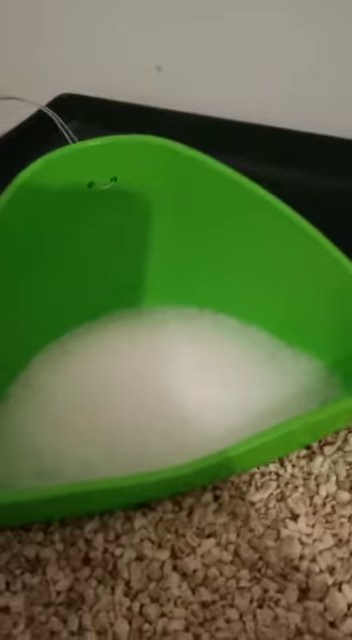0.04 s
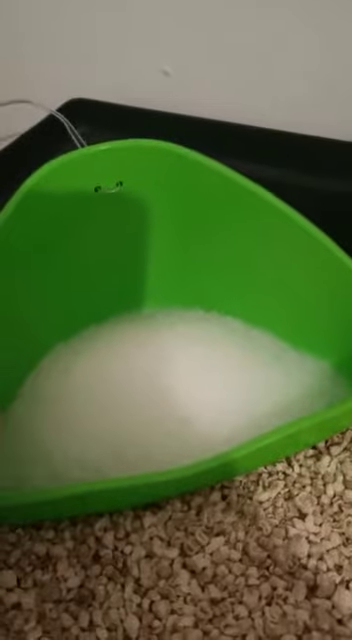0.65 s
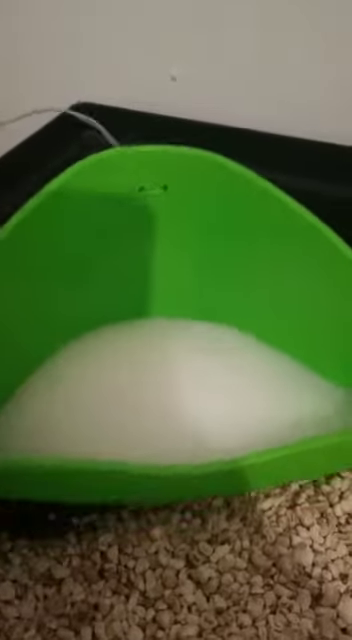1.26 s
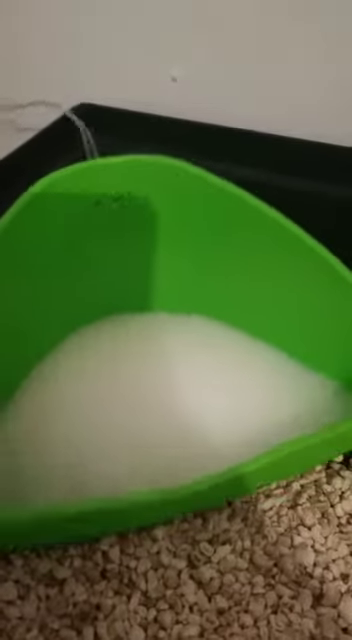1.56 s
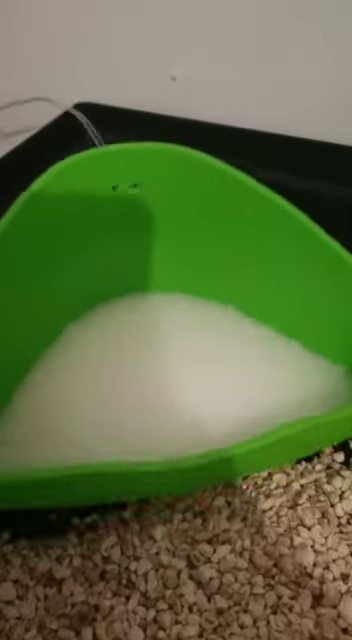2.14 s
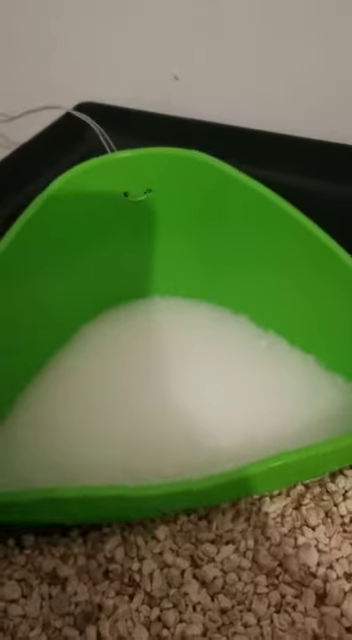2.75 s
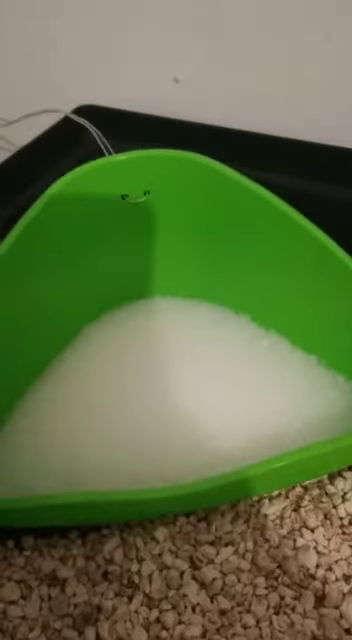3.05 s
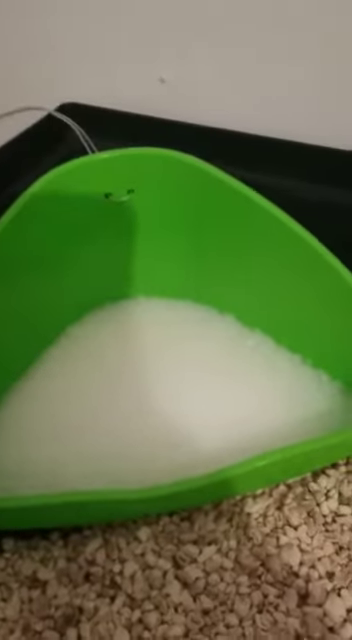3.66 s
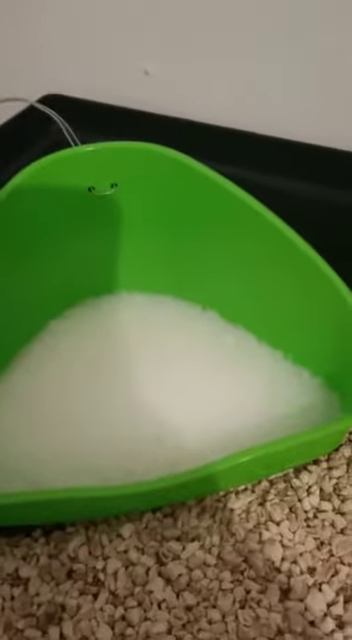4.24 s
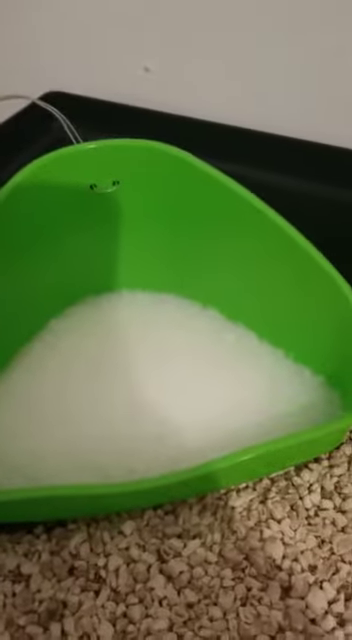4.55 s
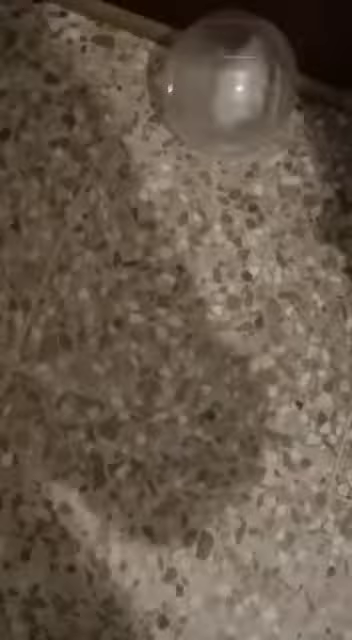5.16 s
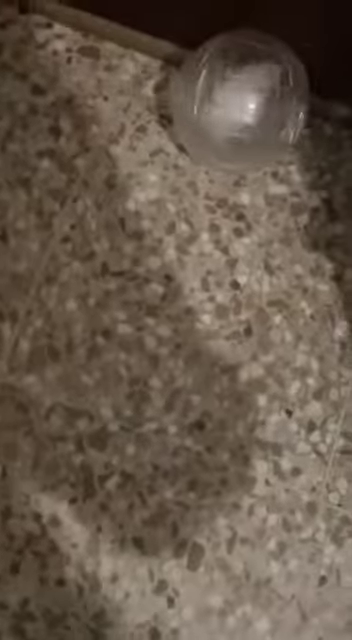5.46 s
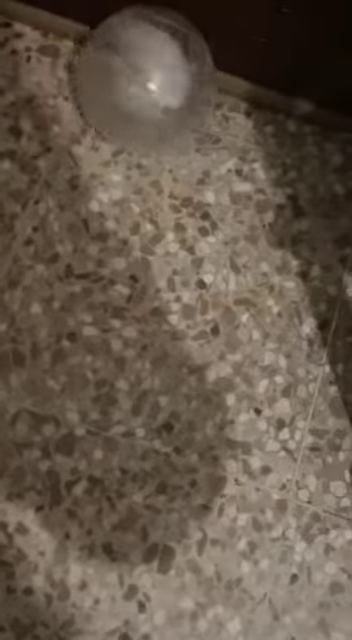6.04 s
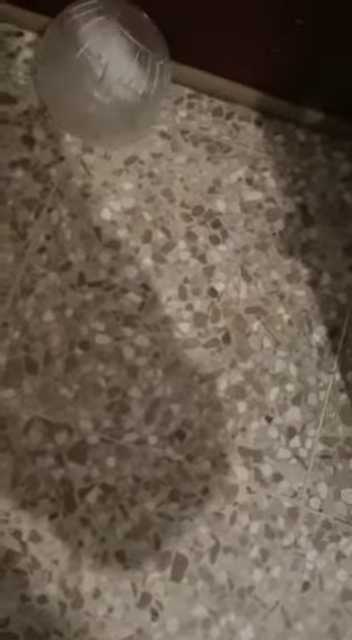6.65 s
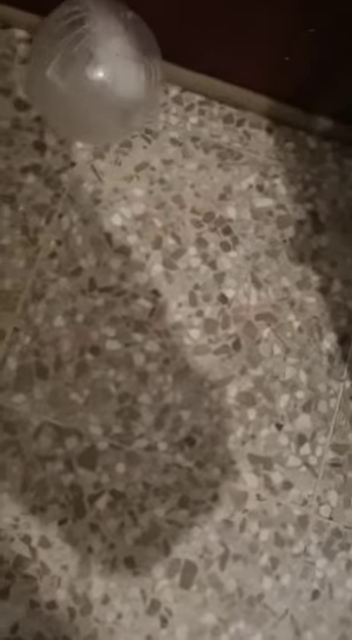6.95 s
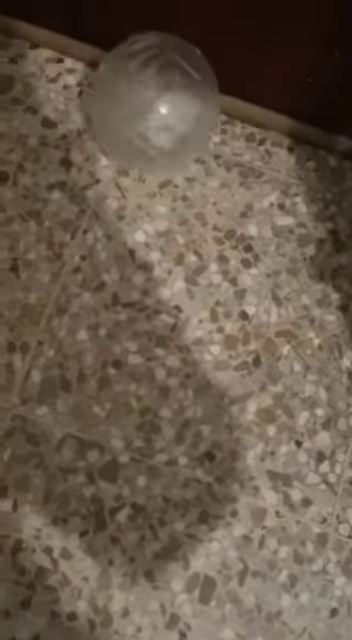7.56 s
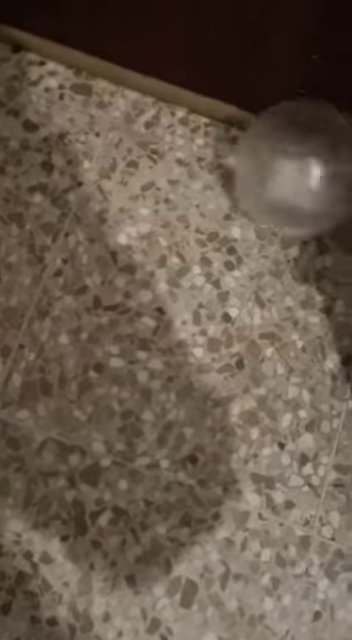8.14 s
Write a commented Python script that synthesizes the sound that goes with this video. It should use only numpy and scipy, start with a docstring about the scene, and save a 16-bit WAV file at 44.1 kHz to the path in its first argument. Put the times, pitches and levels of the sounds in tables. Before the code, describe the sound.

In a small hard room, fine sand is shaken from a carton into a plastic bowl, hissing in bursts while the card rustles, snaps and thumps. A plastic exercise ball knocks and hums faintly further off. After a brief silence the ball is close to the microphone: it bumps a wooden door with a boom, chatters, then rumbles softly over stone with light clicks and one sharp clack.

```python
"""A small hard room, where fine sand is shaken from a carton into a plastic bowl. The sand slides along
the card and hisses onto the heap; the card rustles, buckles with a snap and squeaks once. Further off,
a pet's plastic exercise ball knocks about, its hard shell ringing. After a brief silence the ball is
close by: it bumps a wooden door, rumbles over the stone floor and clacks against the threshold."""
import sys
import numpy as np
from scipy import signal
from scipy.io import wavfile
from scipy.ndimage import uniform_filter1d

SR = 44100
rng = np.random.default_rng(int(sys.argv[2]) if len(sys.argv) > 2 else 0)


def store_wav(level_fs):
    """Save 16-bit WAV to argv[1]."""
    pcm = np.round(np.clip(np.atleast_2d(level_fs), -1, 1) * 32767)
    wavfile.write(sys.argv[1], SR, pcm.T.astype(np.int16))


N = 370440
TIME = np.arange(N) / SR
BAND_EDGES = np.geomspace(22, 17000, 27)
BAND_HZ = np.sqrt(BAND_EDGES[1:] * BAND_EDGES[:-1])
BANDS = [signal.butter(2, pair, "band", fs=SR, output="sos") for pair in zip(BAND_EDGES, BAND_EDGES[1:])]

# Shakes of the carton. Each row: start in seconds, hold in seconds, then relative levels in dB of
# rustle, sand hiss and flexing.
SHAKES = [(0.278, .06, -76, -81, -83.5), (0.451, 0.22, -72.5, -77.5, -78), (0.8, 0.088, -49.5, -63, -51),
          (1.009, 0.19, -52.5, -69, -55), (1.234, 0.054, -51, -62, -52), (1.414, 0.095, -54.5, -71, -58.5),
          (1.551, 0.25, -52.5, -63.5, -58), (1.888, 0.12, -55.5, -64, -66), (2.059, 0.12, -58, -66, -57.5),
          (2.262, 0.15, -56.5, -72, -59.5), (2.48, 0.023, -63, -92, -72), (2.579, 0.078, -57.5, -76, -58),
          (2.702, 0.11, -77, -80, -72), (2.866, 0.019, -72, -81, -56), (2.948, 0.11, -66.5, -77, -69)]
# Rushes of sand. Each row: peak time in seconds, level in dB, half length in seconds.
SURGES = [(1.021, -47.5, 0.02), (1.063, -45.5, 0.022), (1.158, -43.5, 0.012), (1.666, -44.5, 0.012),
          (1.687, -54, .005), (1.758, -48.5, 0.015), (1.921, -51.5, 0.023), (2.096, -46, 0.01),
          (2.617, -52, 0.047)]
# Tone of the dry slide, the surges and crinkles, and the bright hiss. Each row: frequency in Hz, gain in dB.
RUSTLE_EQ = [(350, -5), (620, -12.5), (850, -12), (1050, -11), (1450, -11), (2200, -2.5), (2700, -5.5),
             (3600, -3), (5000, -5), (6300, -21), (9000, -37)]
SURGE_EQ = [(500, -2.5), (1300, -5), (2300, -5), (3700, 0), (5000, -20.5), (8000, -31)]
HISS_EQ = [(3000, -14.5), (5000, 9.5), (6500, 5), (9000, -0.5), (11000, -2.5), (13300, -5), (15500, 1)]
# The carton's stereo placement. Each row: frequency in Hz, left minus right in dB.
CARTON_PAN = [(100, 0), (300, 3.5), (600, -3), (1000, 5.5), (2200, -6.5), (6000, -3), (13000, -9)]

def sand_pouring():
    """Sand slides along the crinkling card in clumps, now and then surges, and patters on the heap."""
    rustle = hiss = 0
    for start, hold, rustle_db, hiss_db, _ in SHAKES:
        flow = swell(start, attack=0.011, hold=hold, t60=0.28)
        rustle += from_db(rustle_db) * flow
        hiss += from_db(hiss_db) * flow
    surge = sum(from_db(db) * bell(peak, half) for peak, db, half in SURGES)
    grit = grains(per_s=1500, spread_db=2.6, t60=0.004, bed=0.5)
    clumps = grains(per_s=220, spread_db=1.9, t60=0.16, bed=0.35)
    crinkles = grains(per_s=70, spread_db=3, t60=0.004, bed=0)
    sliding = from_db(2.67) * rustle * coloured(grit * clumps, RUSTLE_EQ, CARTON_PAN)
    surging = surge * coloured(grit, SURGE_EQ, CARTON_PAN)
    crinkling = from_db(-3) * rustle * coloured(crinkles, SURGE_EQ, CARTON_PAN)
    patter = grains(per_s=3700, spread_db=1.5, t60=0.0015, bed=0.25)
    stream = from_db(2.5) * hiss + from_db(-23) * surge
    falling = stream * coloured(patter * clumps, HISS_EQ, CARTON_PAN)
    return sliding + surging + crinkling + falling


# The low flutter of bending card. Each row: frequency in Hz, gain in dB.
FLEX_EQ = [(21, -35.5), (35, -3.5), (65, 5.5), (125, 0.5), (160, -2.5), (194, -11.5), (258, 3),
           (430, -11.5), (600, -7.5), (780, -36.5), (1320, -120)]

def carton_flexing():
    """The box flexes with every shake."""
    bend = sum(from_db(db) * swell(start, attack=0.011, hold=hold, t60=0.3)
               for start, hold, _, _, db in SHAKES)
    flutter = grains(per_s=50, spread_db=2.5, t60=0.035, bed=0.14)
    return from_db(6.5) * bend * coloured(flutter, FLEX_EQ, CARTON_PAN)


# Snaps of the card. Each row: start in seconds, relative crack level in dB, then hollow lows, body and
# treble edge in dB against the crack.
SNAPS = [(0.6775, -34.5, -9.5, -7.5, -34), (0.7995, -29.5, -16, -10, -19.5),
         (0.8185, -34, -19.5, -2.5, -22), (0.869, -39, -18, 1.5, -14.5), (0.888, -28, -15, -10, -29),
         (0.9714, -38.5, -20.5, -7.5, -31), (1.2324, -20.5, -36, -12, -31), (1.2447, -34, -23.5, -0.5, -22),
         (1.2603, -33.5, -23, -12.5, -11), (1.2849, -28, -17.5, -4, -25), (1.3083, -26, -13.5, -12.5, -28),
         (1.6, -44.5, -22.5, -21.5, -10), (1.71, -31, -21, -9, -24.5), (1.9254, -17, -16, -12, -33),
         (1.9408, -31, -10, -19, -29.5), (2.106, -22, -15, -15.5, -42), (2.2645, -42.5, -10, -7.5, -46.5),
         (2.2883, -33, -19.5, -12, -35.5), (2.3408, -27, -9.5, 2.5, -20), (2.349, -23.5, -24, -19, -22),
         (2.354, -34, -18, -18, -17), (2.4801, -42, -23, -37, -57), (2.592, -28.5, -22, -19.5, -51.5),
         (2.6575, -31.5, -26.5, -16, -32.5), (2.8212, -35, -14, -5.5, -36.5),
         (2.8748, -24.5, -21.5, -23, -28.5), (3.5717, -59.5, -3, -5, -18), (3.618, -52, -9.5, -8.5, -19)]
# Tone of a snap. Each row: frequency in Hz, gain in dB.
SNAP_EQ = [(80, -8.5), (150, -1.5), (300, 1), (600, 0.5), (1050, -4), (1600, -10), (2300, -8.5), (3500, -7),
           (5000, -7), (7000, -5), (10000, -5.5), (14000, 0.5)]
# The hollow box, a buckle's first click and the stiff panels.
# Each row: pitch in Hz, relative level in dB, ring time in seconds.
BOX_MODES = [(136.6, -18, 0.15), (241, -5, 0.1), (278, -1.5, 0.13), (334.2, -7, 0.28), (366, -11, 0.22),
             (404, -9.5, 0.1), (534, -15, 0.13), (603, -9, 0.075), (677, -15.5, .2), (974, -13, 0.046)]
CLICK_MODES = [(1050, -7, .004), (2400, -2, .003), (3400, 0, .003)]
PANEL_MODES = [(614, -3, .08), (700, -9, .15), (1232, -5, .09), (1496, -9, .07), (1960, -5, .09),
               (2320, -6, .08), (3285, -2, .08), (3955, -4, .09)]

def carton_snaps():
    """The card buckles with a crack; its panels and the hollow box ring after it."""
    out = np.zeros((2, N))
    for start, crack_db, hollow_db, body_db, edge_db in SNAPS:
        burst = crack(crack_db, hollow_db, body_db, edge_db, eq=SNAP_EQ, placement=CARTON_PAN,
                      length_s=0.016, bass_hz=500, snap_db=0, tail_db=-22.5, tail_t60=0.2)
        add(out, start, from_db(-21) * burst)
        add(out, start, from_db(crack_db + hollow_db + 1.5) * ring(BOX_MODES, uneven_db=2.5) * pan(1))
        add(out, start + 0.001, from_db(crack_db - 1.5) * ring(CLICK_MODES, uneven_db=1) * pan(-3))
        add(out, start, from_db(crack_db - 22.5) * ring(PANEL_MODES, uneven_db=4.5) * pan(-2.5))
    return out


# Dull low thumps of the carton in the hand. Each row: start in seconds, relative level in dB.
THUMPS = [(1.307, -50), (2.35, -45.5), (2.658, -53), (2.877, -42.5)]
# The box's low end. Each row: pitch in Hz, relative level in dB, ring time in seconds.
THUMP_MODES = [(68.7, -4, .18), (103, 1.5, 0.19), (134, -4, 0.36)]

def carton_thumps():
    """The sand's weight shifts and the box gives a dull thump in the hand."""
    out = np.zeros((2, N))
    for start, db in THUMPS:
        add(out, start, from_db(db) * ring(THUMP_MODES, uneven_db=5.5, polarity=1))
    return out


# The card's thin squeak. Each row: pitch in Hz, relative level in dB, ring time in seconds.
SQUEAK_MODES = [(2600, -2.5, .006), (3600, -1.5, 0.01), (4170, -3, .012)]

def carton_squeak(slips_per_s=620):
    """The card sticks and slips in one quick, slightly uneven run that makes it ring."""
    cycles = np.floor(np.cumsum(slips_per_s * (1 + 2 * rng.standard_normal(N))) / SR)
    slips = np.diff(np.maximum.accumulate(cycles), prepend=0)
    tone = rms_one(signal.fftconvolve(slips, ring(SQUEAK_MODES, uneven_db=3))[:N])
    return from_db(-41) * swell(1.475, attack=0.001, hold=0.009, t60=0.04) * tone * pan(-2)


# Close hits of the ball. Each row: start in seconds, relative crack level in dB, hollow lows and
# treble edge in dB against the crack, high shell resonance in Hz.
CLACKS = [(5.1873, -31.5, 1.5, -27, 3790), (5.831, -64, -8.5, -18, 3880), (6.187, -66.5, 3, -18.5, 3000),
          (6.472, -62.5, -3, -18, 2240), (6.569, -59.5, -0.5, -24, 2290), (6.685, -60.5, -25, -42, 2070),
          (7.102, -66, -24.5, -11, 3520), (7.718, -63.5, 9.5, -25.5, 2990),
          (7.8753, -32.5, -19.5, -66, 4250), (8.058, -55, -10, -42, 3760), (8.118, -61.5, 16.5, -29, 3800),
          (8.198, -51, -26, -17.5, 3670), (8.282, -63, -5, -29, 3850)]
# Tone of a close hit. Each row: frequency in Hz, gain in dB.
CLACK_EQ = [(80, 3), (150, -2), (300, -0.5), (600, -2), (900, -0.5), (1400, -5), (2400, -6), (3800, -9),
            (4900, 4), (6300, -12), (9000, 4.5), (14000, 1.5)]
# The shell's ring-out. Each row: pitch in Hz, relative level in dB, ring time in seconds.
SHELL_MODES = [(760, -8, 0.079), (853, -19, 0.12), (925, -1.5, 0.17), (1770, -3, 0.13), (2477, 4, .22),
               (3470, 1, 0.14), (4100, -7, 0.091), (4090, 1, .11)]

def ball_clacks(gap_s=0.046, loss_db=4):
    """The shell strikes close by and chatters against the door, each touch weaker than the last."""
    out = np.zeros((2, N))
    chatter = [(5.284 + k * gap_s, -50 - k * loss_db, 3.5, -30, 3430) for k in range(4)]
    for start, crack_db, hollow_db, edge_db, high_hz in CLACKS + chatter:
        burst = crack(crack_db, hollow_db, body_db=-9, edge_db=edge_db, eq=CLACK_EQ, placement=BALL_PAN,
                      length_s=0.063, bass_hz=308, snap_db=-6, tail_db=-37, tail_t60=0.24)
        add(out, start, shell(burst, high_hz))
        add(out, start, from_db(crack_db - 26) * ring(SHELL_MODES, uneven_db=1))
    return out


# The plastic's two resonances, low then high. Each row: width in Hz, boost in dB.
SHELL_PEAKS = [(150, 9), (900, 6)]

def shell(burst, high_hz, low_hz=883):
    """The hard shell colours a crack with two resonances; the high one depends on the spot struck."""
    return from_db(-20.5) * resonate(burst, [(low_hz, *SHELL_PEAKS[0]), (high_hz, *SHELL_PEAKS[1])])


# Heavy landings. Each row: start in seconds, relative level in dB, tilt in dB per octave.
BUMPS = [(5.186, -29, 4), (5.284, -46.5, -2.5), (5.386, -49, -0.5), (5.983, -61, -4), (6.564, -65, -6.5),
         (7.72, -61, 17), (7.919, -54.5, -1.5), (8.116, -49.5, 3)]
# The boom of ball and door. Each row: pitch in Hz, relative level in dB, ring time in seconds.
BOOM_MODES = [(39.24, -5, 0.98), (61.77, -2, 0.92), (97.74, 3, 0.71), (113.9, 3, 0.5), (125.1, 0.5, 0.57),
              (235, -19, 0.48), (265.3, -7.5, 0.31), (283, -35.5, 0.35), (340, -50, 0.33),
              (411, -29.5, 0.34)]

def ball_bumps():
    """The ball's weight lands and sets off a low boom."""
    out = np.zeros((2, N))
    for start, db, tilt_db in BUMPS:
        add(out, start, -from_db(db) * ring(BOOM_MODES, uneven_db=2, tilt_db=tilt_db, polarity=1))
    return out * pan(0.7)


# Fader moves of the close roll. Each row: time in seconds, relative rumble and scratch levels in dB.
ROLL = [(5.62, -76.5, -82), (5.87, -58.5, -74.5), (6.01, -58.5, -73.5), (6.32, -60.5, -77.5),
        (6.56, -59, -66.5), (6.79, -71, -92), (7.2, -72.5, -91), (7.42, -70.5, -83), (7.69, -57, -75),
        (7.87, -55.5, -69), (8.05, -58.5, -67), (8.29, -68, -66.5), (8.4, -66, -62.5)]
# Tone of plastic on stone. Each row: frequency in Hz, gain in dB.
SCRATCH_EQ = [(410, -25), (530, -3), (690, -4.5), (900, 1), (1300, -9), (2400, -5.5), (4000, -15),
              (7000, -32)]
# The ball's stereo placement. Each row: frequency in Hz, left minus right in dB.
BALL_PAN = [(100, -3), (300, 7), (1000, -2), (3000, 1), (13000, -4)]

def ball_rolling():
    """Seams and grit jolt the nearby ball into a lurching rumble as it scratches over the stone."""
    times, *levels = np.transpose(ROLL)
    rumble, scratch = [from_db(np.interp(TIME, times, db, left=-np.inf, right=-np.inf)) for db in levels]
    lurches = uniform_filter1d(grains(per_s=14, spread_db=1, t60=0.25, bed=0.5), size=400)
    rumbling = rumble * lurches * jolted(BOOM_MODES, per_s=60, tilt_db=1) * pan(0.7)
    grit = grains(per_s=110, spread_db=2.5, t60=0.03, bed=0.6)
    return rumbling + from_db(-3) * scratch * coloured(grit, SCRATCH_EQ, BALL_PAN)


# Distant hits of the ball. Each row: start in seconds, relative crack level in dB, hollow lows and
# body in dB against the crack, high shell resonance in Hz.
FAR_KNOCKS = [(0.579, -56.5, 3, 0.5, 3000), (0.611, -54.5, 3, -8, 3200), (2.995, -52, -8, -3, 2540),
              (3.025, -61.5, -3, 1, 2400), (3.123, -55, -4, -31, 4200), (3.209, -56, -6, -1.5, 3000),
              (3.218, -46.5, -2, -5.5, 4020), (3.8532, -47, -7.5, -14, 3470), (3.873, -45, -12, -18, 4500),
              (4.163, -67.5, -9, 0.5, 2840), (4.2633, -60.5, -22, 6.5, 4030), (4.274, -54.5, -3, -21, 4020),
              (4.7351, -58.5, 13, -1, 2260), (5.069, -79.5, 10.5, 13.5, 2960)]
# Tone of a distant hit. Each row: frequency in Hz, gain in dB.
FAR_KNOCK_EQ = [(80, -41.5), (200, -0.5), (400, -7.5), (900, -2.5), (1300, -4.5), (2200, -3.5),
                (4000, -2.5), (5600, -6.5), (9000, -10), (14000, 10)]

def ball_far_knocks():
    """Distance blurs and dulls the ball's knocks."""
    out = np.zeros((2, N))
    for start, crack_db, hollow_db, body_db, high_hz in FAR_KNOCKS:
        burst = crack(crack_db, hollow_db, body_db, edge_db=-33.5, eq=FAR_KNOCK_EQ, placement=BALL_PAN,
                      length_s=0.082, bass_hz=286, snap_db=-17, tail_db=-30, tail_t60=0.17)
        add(out, start, shell(burst, high_hz))
        add(out, start, from_db(crack_db - 18) * ring(SHELL_MODES, uneven_db=2))
    return from_db(2) * out


# Short distant runs. Each row: start in seconds, hold in seconds, level in dB.
FAR_RUNS = [(0.396, 0.63, -61.5), (2.297, .5, -60.5), (3.15, 0.11, -64.5), (3.657, .08, -58.5),
            (4.153, 0.032, -70.5)]
# Their hum. Each row: pitch in Hz, relative level in dB, ring time in seconds.
HUM_MODES = [(133, 0, .35), (168, -2, .3), (200, 0, .35), (233, -4, .3), (320, -7, .25)]

def ball_far_runs():
    """Far off, the jolted ball hums as it runs up, rolls and coasts to rest."""
    runs = sum(from_db(db) * swell(start, attack=0.19, hold=hold, t60=1.1) for start, hold, db in FAR_RUNS)
    return runs * jolted(HUM_MODES, per_s=120, tilt_db=0) * pan(0.7)


# The reverb tail. Each row: frequency in Hz, decay time in seconds.
ROOM_DECAY = [(100, 0.42), (400, 0.26), (1000, 0.42), (3500, 0.3), (7000, 0.36), (14000, 0.61)]

def room(send, placement, predelay_s=0.0039):
    """Diffuse reflections off hard walls and a stone floor; each band dies at its own rate."""
    t = TIME[:SR * 2 // 3]
    white, tail = rng.standard_normal((2, 2, len(t))), 0
    for k, hz in enumerate(BAND_HZ):
        band = stereo(signal.sosfilt(BANDS[k], white[k % 2]), hz, placement)
        tail += band * fade(t, at_hz(ROOM_DECAY, hz))
    tail = rms_one(tail * (t > predelay_s)) / np.sqrt(len(t))
    return signal.fftconvolve(send[:1] + send[1:], tail, axes=1)[:, :N] / np.sqrt(2)


# The background bed. Each row: frequency in Hz, gain in dB.
ROOM_TONE_EQ = [(12, -33), (20, -1), (27, -5), (70, -2.5), (130, -26.5), (198, -12.5), (228, -27.5),
                (310, -13.5), (347, -21.5), (590, -23.5), (698, -25.5), (3740, -26), (5850, -34),
                (14700, -38), (16000, -44.5)]

def room_tone():
    """Faint, steady air, heaviest in the bass."""
    return from_db(-68.5) * coloured(1, ROOM_TONE_EQ, placement=[(1, 0)])


# Tone controls of a hit, in Hz: hollow lows, body, bottom and top of the crack, treble edge.
ZONES_HZ = [280, 850, 2000, 4500, 9500]

def crack(crack_db, hollow_db, body_db, edge_db, eq, placement, length_s, bass_hz,
          snap_db, tail_db, tail_t60):
    """One contact: a sharp snap, dense vibration that lasts longer in the bass, a faint after-ring."""
    t = TIME[:SR // 4]
    white, burst = rng.standard_normal((2, 2, len(t))), 0
    snap_and_tail = from_db(snap_db) * fade(t, length_s / 5) + from_db(tail_db) * fade(t, tail_t60)
    zone_db = np.interp(np.log(BAND_HZ), np.log(ZONES_HZ), [hollow_db, body_db, 0, 0, edge_db])
    band_db = crack_db + at_hz(eq, BAND_HZ) + zone_db
    for k, hz in enumerate(BAND_HZ):
        if hz > eq[0][0]:
            envelope = fade(t, length_s * (1 + bass_hz / hz)) + snap_and_tail
            pair = signal.sosfilt(BANDS[k], white[k % 2] * envelope)
            burst += from_db(band_db[k]) * stereo([rms_one(x) for x in pair], hz, placement)
    return burst


def ring(modes, uneven_db, tilt_db=0, polarity=-1):
    """One blow on modes of uneven strength; they start in turn up and down (-1) or together (1)."""
    hz, db, t60 = np.transpose(modes)[:, :, None]
    t = TIME[:int(t60.max() * SR)]
    db = db + rng.normal(0, uneven_db, hz.shape) + tilt_db * np.log2(hz / np.median(hz))
    partials = from_db(db) * np.sin(2 * np.pi * hz * t) * fade(t, t60)
    return polarity ** np.arange(len(hz)) @ partials


def jolted(modes, per_s, tilt_db):
    """Modes kept ringing by small random jolts, their level partly evened out; rms 1."""
    jolts = rng.standard_normal(N) * grains(per_s, spread_db=5, t60=0.09, bed=1)
    hum = signal.fftconvolve(jolts, ring(modes, uneven_db=0, tilt_db=tilt_db))[:N]
    power = uniform_filter1d(rms_one(hum) ** 2, size=SR // 12)
    return rms_one(hum / (power + 0.01) ** 0.3)


def grains(per_s, spread_db, t60, bed):
    """Envelope of random tiny contacts of uneven size over an even bed."""
    sizes = from_db(spread_db * np.minimum(rng.exponential(1, N), 4))
    hits = rng.random(N) < per_s / SR
    energy = signal.lfilter([1], [1, -fade(2 / SR, t60)], hits * sizes ** 2 + 1e-18)
    return np.sqrt(energy / energy.mean() + bed)


def coloured(drive, eq, placement):
    """Noise under a drive envelope, shaped band by band; rms 1."""
    white, out = rng.standard_normal((2, 2, N)) * drive, 0
    for k, hz in enumerate(BAND_HZ):
        if eq[0][0] <= hz <= eq[-1][0]:
            out += from_db(at_hz(eq, hz)) * stereo(signal.sosfilt(BANDS[k], white[k % 2]), hz, placement)
    return rms_one(out)


# Stereo width. Each row: frequency in Hz, left-right correlation.
CORRELATION = [(60, 0.0086), (125, 1), (250, 0.6), (500, 0.24), (1000, -0.064), (2500, -0.049),
               (8000, -0.058)]

def stereo(pair, hz, placement):
    """Two unrelated signals become mid and side, narrow in the upper bass and leaning left or right."""
    alike = at_hz(CORRELATION, hz)
    mid, side = np.sqrt(1 + alike) * pair[0], np.sqrt(1 - alike) * pair[1]
    return np.array([mid + side, mid - side]) * pan(at_hz(placement, hz) / 2) / np.sqrt(2)


def resonate(x, peaks):
    """Pass a sound through broad peaks and dips."""
    for hz, width, db in peaks:
        gain, angle = from_db(db / 2), 2 * np.pi * hz / SR
        damping, tuning = np.sin(angle) * width / hz / 2, -2 * np.cos(angle)
        x = signal.lfilter([1 + damping * gain, tuning, 1 - damping * gain],
                           [1 + damping / gain, tuning, 1 - damping / gain], x + 1e-18)
    return x


def swell(start, attack, hold, t60):
    """Envelope that rises, holds and dies away."""
    t = TIME - start
    return np.clip(t / attack, 0, 1) * fade(np.clip(t - attack - hold, 0, 3 * t60), t60)


def bell(peak, half):
    """Envelope that swells and sinks evenly around a moment."""
    return np.exp(-0.5 * np.minimum(((TIME - peak) / half) ** 2, 100))


def fade(t, t60):
    """Decay by 60 dB in t60 seconds."""
    return np.exp(-np.log(1000) * t / np.maximum(t60, 1e-3))


def pan(db):
    """Raise the left and lower the right by db."""
    return from_db([[db], [-db]])


def from_db(db):
    """Decibels to gain."""
    return 10 ** (np.asarray(db) / 20)


def rms_one(x):
    """Scale to unit rms."""
    return x / np.sqrt(np.mean(x ** 2) + 1e-30)


def at_hz(points, hz):
    """Read a table on a log-frequency axis."""
    freqs, values = np.transpose(points)
    return np.interp(np.log(hz), np.log(freqs), values)


def add(out, start, sound):
    """Mix a sound in at a time."""
    i = int(start * SR)
    out[..., i:i + sound.shape[-1]] += sound[..., :N - i]


def scene():
    """Near sounds are mostly direct; the far knocks get the most reverb."""
    card = carton_snaps() + carton_squeak()
    knocks, clacks = ball_far_knocks(), ball_clacks()
    reverb = room(from_db(-14) * card, CARTON_PAN) + room(knocks + from_db(-8) * clacks, [(1, 0)])
    background = reverb + room_tone()
    hits = card + knocks + clacks + carton_thumps() + ball_bumps()
    return hits + sand_pouring() + carton_flexing() + ball_rolling() + ball_far_runs() + background


# The microphone's colour. Each row: centre in Hz, width in Hz, gain in dB.
MIC_EQ = [(640, 80, 1.5), (3954, 920, 4.5), (4600, 1700, -5.5), (13000, 5000, 4)]

def record(dry):
    """The microphone colours the sound, a brief silence parts the two scenes, and the top is cut."""
    gate = uniform_filter1d(1.0 * ((TIME < 4.856) | (TIME > 4.983)), size=200)
    high_cut = signal.ellip(10, 0.1, 80, 15600, fs=SR, output="sos")
    return signal.sosfilt(high_cut, resonate(dry, MIC_EQ) * gate)


dry = scene()
out = record(dry)
store_wav(out)
```